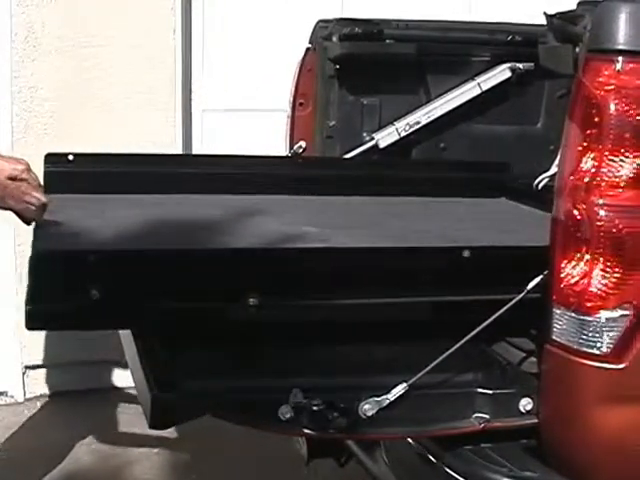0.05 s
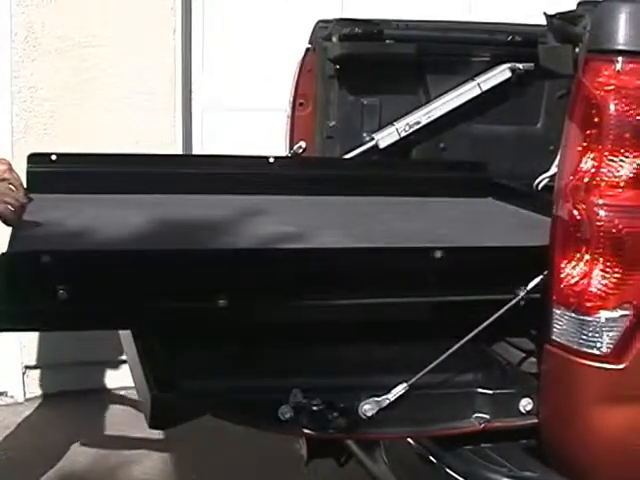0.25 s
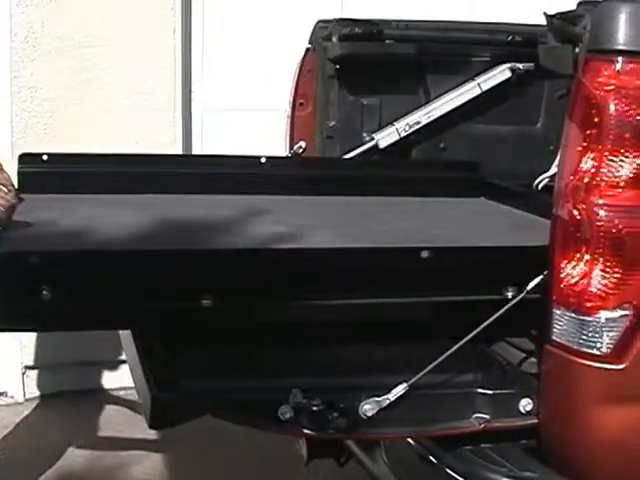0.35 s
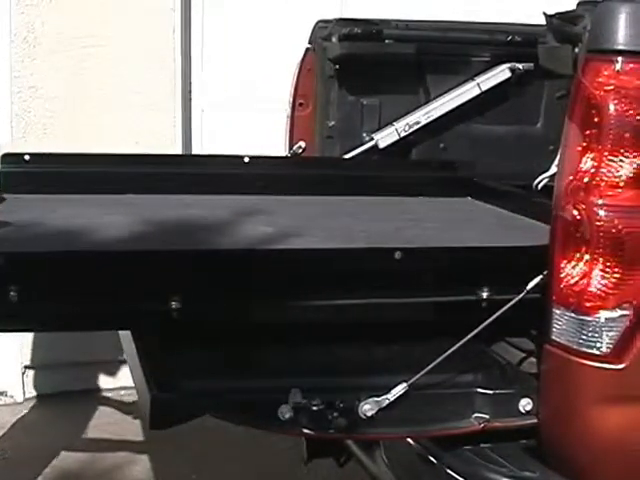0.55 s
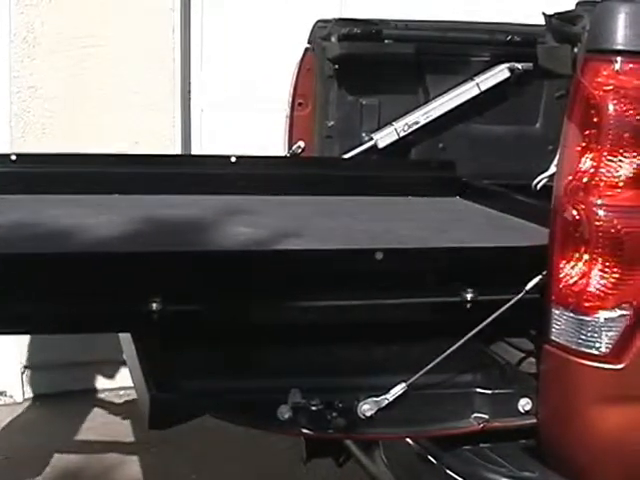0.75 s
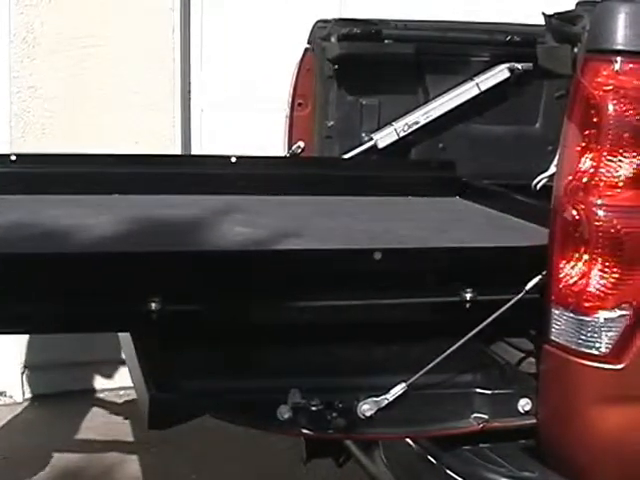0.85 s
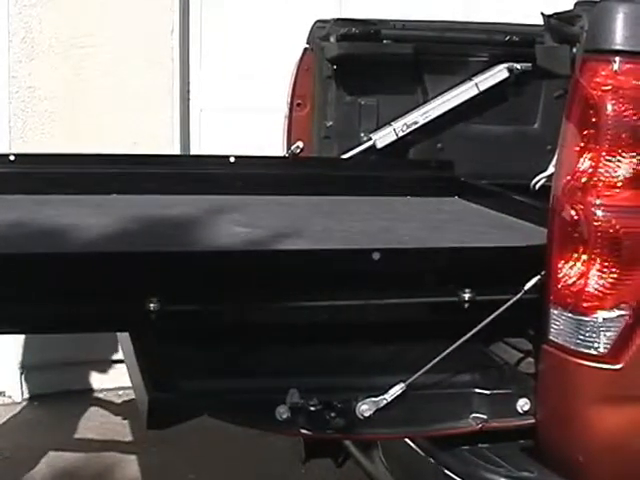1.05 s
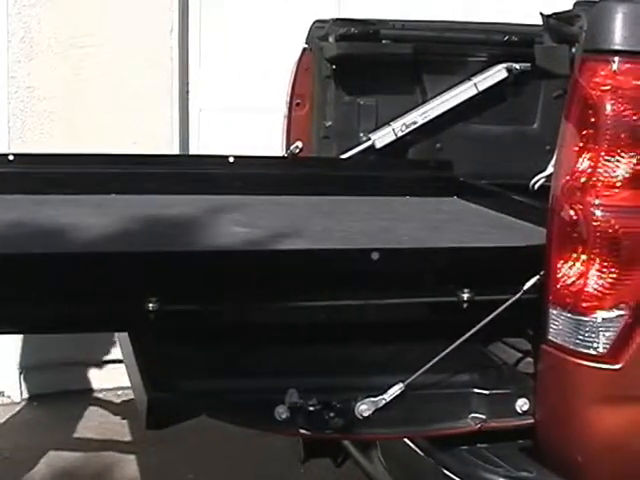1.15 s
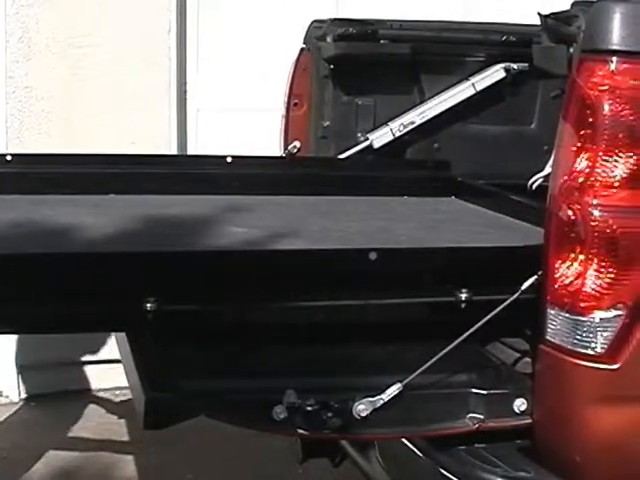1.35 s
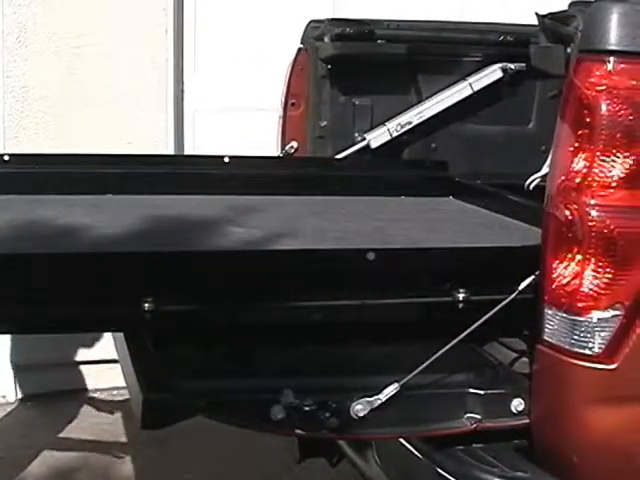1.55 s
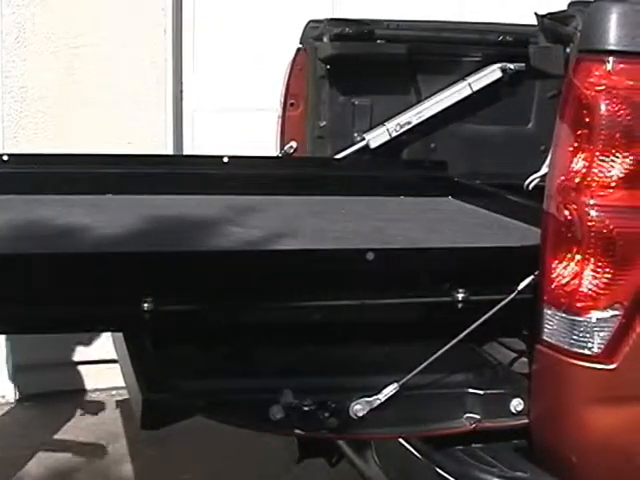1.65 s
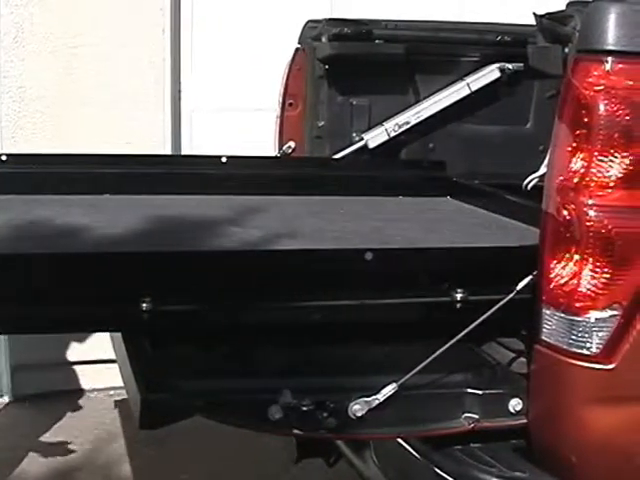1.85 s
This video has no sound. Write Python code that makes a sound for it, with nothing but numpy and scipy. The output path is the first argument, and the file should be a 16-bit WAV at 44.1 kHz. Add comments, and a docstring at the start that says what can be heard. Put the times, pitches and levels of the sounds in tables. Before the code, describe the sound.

A metal cargo tray slides along its rails with a very high, stuttering squeal, then hits its stop with a rattling thud and settles. Outdoors, faint wind puffs on the microphone over a quiet hiss.

```python
"""Cargo tray sliding to its stop

A metal tray rolls along its rails in a truck bed, outdoors. Friction makes a dry runner squeal near
10 kHz, with a weaker second mode and their combination tones. The tray hits its stop, rattles and
settles. Light puffs of wind bump the microphone; the squeal makes the camera turn its gain down."""
import sys
import numpy as np
from scipy import signal
from scipy.fft import rfft, irfft, next_fast_len
from scipy.io import wavfile
from scipy.ndimage import uniform_filter1d, minimum_filter1d, map_coordinates

SR = 44100
rng = np.random.default_rng(int(sys.argv[2]) if len(sys.argv) > 2 else 0)


def digitize_waveform(pressure):
    """Quantize a signal to 16-bit integers and store it at the path in sys.argv[1].

    Rows of a 2-D input are taken as channels; values are limited to [-1, 1].
    """
    field = np.atleast_2d(pressure).T
    bounded = np.clip(field, -1, 1)
    quanta = np.round(bounded * 32767).astype(np.int16)
    wavfile.write(sys.argv[1], SR, quanta)


N = 83790


def amp(db):
    """Decibels to gain."""
    return 10 ** (np.asarray(db) / 20)


def unit(x):
    """Scale to rms 1."""
    return x / np.sqrt(np.mean(x ** 2) + 1e-20)


def clock():
    """Sample times in s."""
    return np.arange(N) / SR


def along(points, hz):
    """Interpolate (f/Hz, value) points on a log axis."""
    f, v = np.transpose(points)
    return np.interp(np.log(hz + 1), np.log(f + 1), v)


def curve(rows):
    """Interpolate (t/s, value) rows per sample."""
    return np.interp(clock(), *np.transpose(rows))


def envelope(rows):
    """Gain from (t/s, level/dB) rows, falling 170 dB/s after the last."""
    return amp(curve(rows) - 170 * np.maximum(clock() - rows[-1][0], 0))


def wobble(rate_hz):
    """Smooth random curve through unit-variance knots."""
    knots = rng.standard_normal(int(N * rate_hz / SR) + 4)
    return map_coordinates(knots, [np.arange(N) * rate_hz / SR])


def swell(at_s, half_s):
    """Gaussian envelope, 1/e at half_s from its peak."""
    return np.exp(-((clock() - at_s) / half_s) ** 2)


def burst(at_s, rise_s, t60_s):
    """Linear rise, exponential decay."""
    age_s = clock() - at_s
    return np.clip(age_s / rise_s, 0, 1) * amp(-60 * np.maximum(age_s - rise_s, 0) / t60_s)


def filtered(x, response):
    """Zero-phase filter with gain response(hz)."""
    size = next_fast_len(N + SR // 2)
    return irfft(rfft(x, size) * response(np.fft.rfftfreq(size, 1 / SR)), size)[..., :N]


def noise(spectrum):
    """Coloured noise, rms 1."""
    return unit(filtered(rng.standard_normal(N), lambda hz: amp(along(spectrum, hz))))


def modal_noise(spectrum, spacing_hz, ripple_db):
    """Noise rung through many narrow modes of random strength, rms 1."""
    modes_db = ripple_db * rng.standard_normal(N)
    return unit(filtered(noise(spectrum), lambda hz: amp(map_coordinates(modes_db, [hz / spacing_hz]))))


def tone(hz):
    """Sine following a pitch, rms 1."""
    return np.sqrt(2) * np.sin(2 * np.pi * (np.cumsum(hz) / SR + rng.random()))


def ragged_tone(hz, stutter_db=3.6, rasp=.14):
    """Tone that stutters and rasps as a contact slips."""
    return tone(hz) * amp(stutter_db * wobble(129.86)) * (1 + rasp * wobble(900))


# Outdoor air: f/Hz, level/dB
AIR_SPECTRUM = [(220, -3), (700, -9.5), (1800, -16.5), (11500, -21), (13000, -63)]


def air(level_db=-60.5):
    """Quiet, slightly uneven hiss."""
    return amp(level_db + wobble(10.1)) * noise(AIR_SPECTRUM)


def hum(hz=358, level_db=-72):
    """Faint wavering tone."""
    return amp(level_db) * tone(hz + 4 * wobble(9.7))


# Wind rumble: f/Hz, level/dB
WIND_SPECTRUM = [(20, -16.5), (60, 1.5), (110, -2.5), (600, -69.5)]
# Puffs on the microphone: t/s, f/Hz, level/dB
WIND_BUMPS = [(.222, 75, -43), (.907, 80, -47), (1.169, 105, -45), (1.433, 120, -44.5), (1.636, 75, -50),
              (1.75, 130, -49), (1.802, 118, -37.5)]


def wind(rumble_db=-60.5, swing_db=3.3, half_cycles=.56):
    """Wind rumbles on the microphone; each puff is one short low pulse."""
    out = amp(rumble_db + swing_db * wobble(13)) * noise(WIND_SPECTRUM)
    for at_s, hz, db in WIND_BUMPS:
        wave = np.sqrt(2) * np.cos(2 * np.pi * hz * (clock() - at_s))
        out += amp(db) * swell(at_s, half_cycles / hz) * wave
    return out


# Settling rubs: t/s, rise/s, t60/s, level/dB
SCUFF_EVENTS = [(.94, 0.02, 0.19, -58.5), (1.707, 0.018, 0.18, -52), (1.751, 0.017, 0.15, -57.5)]
# Rub noise: f/Hz, level/dB
SCUFF_SPECTRUM = [(200, -8.5), (1800, 2), (4000, -2), (10500, -6), (14000, -32.5)]


def scuffs(grain_db=2.06):
    """Short grainy rubs as the tray settles."""
    return sum(amp(db + grain_db * wobble(350)) * burst(at_s, rise_s, t60_s) * noise(SCUFF_SPECTRUM)
               for at_s, rise_s, t60_s, db in SCUFF_EVENTS)


# Roller envelope: t/s, level/dB
ROLLER_LEVEL = [(0, -54.5), (.39, -49.5), (.56, -60)]
# Roller noise: f/Hz, level/dB
ROLLER_SPECTRUM = [(100, -5.5), (230, -1), (600, -5), (1100, -10), (2000, -25), (7000, -28), (13000, -71.5)]


def rollers(swing_db=1.505):
    """The rollers rumble unevenly in the tray."""
    return envelope(ROLLER_LEVEL) * amp(swing_db * wobble(65)) * noise(ROLLER_SPECTRUM)


# Side tones and faint squeaks: t/s, half-width/s, f/Hz, level/dB
SIDE_CHIRPS = [(.318, .03, 4835, -45.5), (.315, .03, 5270, -45.5), (.31, .013, 14906, -48.5),
               (.272, .015, 9660, -42), (.37, .019, 13830, -45.5), (.365, .03, 3840, -59),
               (.39, .04, 5220, -55), (.463, .024, 5180, -43), (.472, .0307, 14890, -43),
               (.486, .02, 7360, -40.5), (.49, .02, 6400, -40.5), (.49, .026, 3700, -51),
               (.54, .035, 3190, -55), (.54, .04, 9820, -38), (1.104, .027, 1153, -67),
               (1.24, .027, 1275, -70)]


def chirps(jitter=.006):
    """Brief rough side tones and faint squeaks around and after the main squeal."""
    return sum(amp(db) * swell(at_s, half_s) * ragged_tone(hz * (1 + jitter * wobble(400)))
               for at_s, half_s, hz, db in SIDE_CHIRPS)


# Runner grinding: f/Hz, level/dB
GRIND_SPECTRUM = [(2000, -56.5), (3300, -7), (4400, -14.5), (6800, -4.5), (8200, -15.5), (9500, 6),
                  (12000, -19.5), (13500, 2), (15000, -22.5)]


def grind(level_db=-31.5):
    """The runner grinds just before the stop, exciting dense rail modes."""
    gain = amp(level_db + 1.5 * wobble(200)) * burst(at_s=.458, rise_s=.017, t60_s=.19)
    return gain * modal_noise(GRIND_SPECTRUM, spacing_hz=170.3, ripple_db=7)


# Bed booms: t/s, half-width/s, f/Hz, level/dB
BED_THUMPS = [(.576, .008, 215, -35), (.601, .013, 222, -27.5), (.625, .012, 430, -30.5),
              (.695, .055, 105, -43)]


def thumps():
    """The tray's weight presses into its buffer and the bed booms."""
    return sum(amp(db) * swell(at_s, half_s) * tone(hz + 15 * wobble(100))
               for at_s, half_s, hz, db in BED_THUMPS)


# Panel modes, overall shape: f/Hz, level/dB
PANEL_SPECTRUM = [(40, -12.5), (205, -0.5), (450, 2), (1200, -4.5), (1700, -10.5), (2800, -14.5),
                  (9000, -23.5), (12500, -29.5), (15000, -68)]
# Panel decay: f/Hz, t60/s
PANEL_T60 = [(80, 1), (250, 0.46), (1000, 0.4), (9000, 0.36)]


def panel_wash(at_s, rise_s, treble_db):
    """A blow excites dense panel modes; the treble dies first."""
    panels = modal_noise(PANEL_SPECTRUM, spacing_hz=34.88, ripple_db=4)
    hz, frame_s, bins = signal.stft(panels, SR, nperseg=512)
    decay_db = -60 * np.maximum(frame_s - at_s - rise_s, 0) / along(PANEL_T60, hz)[:, None]
    shelf_db = treble_db * along([(300, 0), (2000, 1)], hz)[:, None]
    _, wash = signal.istft(bins * amp(decay_db + shelf_db), SR, nperseg=512)
    return wash[:N] * np.clip((clock() - at_s) / rise_s, 0, 1)


# Main tray modes: f/Hz, relative level/dB, t60/s
TRAY_MODES = [(110, -9, .75), (228, -4, .55), (268.45, -4, .45), (409, -10, .5), (463.35, -2, .38),
              (554, -3, .45), (703, -1, .33), (914, -6, .25), (1285, -6, .3)]


def tray_ring(at_s, rise_s):
    """A blow rings the tray's main modes, each wavering slightly."""
    return sum(amp(db) * burst(at_s, rise_s, t60_s) * tone(hz + 4 * wobble(50.37))
               for hz, db, t60_s in TRAY_MODES)


# Blows on the stop, then settling: t/s, rise/s, level/dB, treble gain/dB
STOP_BLOWS = [(.564, 0.011, -30.5, 0.5), (0.592, 0.008, -33, -1.5), (.615, 0.0072, -22.5, 1),
              (.651, .0043, -26.5, -5), (0.704, 0.0044, -33.5, -6.5), (.933, 0.013, -55, -3.5),
              (1.295, 0.017, -59.5, 0.5)]


def impacts(wash_db=-2.5, ring_db=-12.02, rattle_depth_db=2):
    """The tray hits its stop and settles; each blow rings it and rattles its panels."""
    out = np.zeros(N)
    for at_s, rise_s, db, treble_db in STOP_BLOWS:
        wash = amp(wash_db) * panel_wash(at_s, rise_s, treble_db)
        ring = amp(ring_db) * tray_ring(at_s, rise_s)
        rattle = amp(rattle_depth_db * wobble(260))
        out += amp(db) * (wash * rattle + ring)
    return out


# Steel stop modes: f/Hz, level/dB, t60/s
STOP_MODES = [(4720, -44, .06), (5330, -50, .55)]


def clink(jitter_hz=7):
    """The hardest blow rings the steel stop."""
    at_s, rise_s, *_ = max(STOP_BLOWS, key=lambda blow: blow[2])
    return sum(amp(db) * burst(at_s, rise_s, t60_s) * ragged_tone(hz + jitter_hz * wobble(96.3))
               for hz, db, t60_s in STOP_MODES)


# Second-mode surges: t/s, half-width/s, mode level/dB, upper tone/dB, lower tone/dB
MODE_SURGES = [(0.282, 0.033, -43, -36.5, -54.5), (0.4, .024, -35.5, -30, -45.5),
               (0.477, 0.032, -37, -32, -45.5)]


def surges(main_hz, second_hz):
    """The second mode surges and mixes with the main one, adding a tone above and one below."""
    pitches_hz = second_hz, 2 * main_hz - second_hz, main_hz - second_hz
    out = np.zeros(N)
    for at_s, half_s, *levels_db in MODE_SURGES:
        tones = sum(amp(db) * ragged_tone(hz) for db, hz in zip(levels_db, pitches_hz))
        out += swell(at_s, half_s) * tones
    return out


# Main runner mode: t/s, level/dB
MAIN_LEVEL = [(.125, -79.5), (.204, -24.5), (.222, -9.5), (.24, -10), (.272, -26.5), (.296, -11),
              (.322, -10), (.35, -16.5), (.385, -12), (.417, -21.5), (.458, -13), (.478, -22.5),
              (.492, -15), (.527, -12.5), (.546, -18), (.58, -15.5), (.63, -39), (.668, -34.5), (.716, -48),
              (.87, -67)]
# Friction noise around it: f/Hz, level/dB
SKIRT_SPECTRUM = [(8300, -70), (9400, -13), (10058, 0), (10700, -14), (11800, -70)]
# Runner catches: t/s
CATCH_TIMES = [.274, .414]
# Second mode between surges: t/s, level/dB
SECOND_LEVEL = [(0, -54), (.06, -75), (.13, -55.5), (.25, -46.5), (.34, -78), (.46, -58), (.51, -33.5),
                (.6, -47.5)]
# Second mode pitch: t/s, f/Hz
SECOND_HZ = [(.22, 6860), (.43, 6805), (.48, 6872)]


def squeal(pitch_hz=10058, jitter_hz=7, beat_hz=125, skirt_db=-27):
    """Friction drives two runner modes; the main one flutters and beats briefly at each catch."""
    main_hz = pitch_hz + jitter_hz * wobble(170)
    second_hz = curve(SECOND_HZ) + jitter_hz * wobble(120)
    grip = envelope(MAIN_LEVEL)
    flutter_db = 3.5 * clock() * (1 - grip / grip.max())  # deeper with time and weak grip
    flutter = amp(flutter_db * wobble(150))
    beat = 1 - sum(swell(at_s, half_s=.012) * np.sin(np.pi * beat_hz * (clock() - at_s)) ** 2
                   for at_s in CATCH_TIMES)
    main = grip * tone(main_hz) * flutter * beat
    skirt = grip * amp(skirt_db) * noise(SKIRT_SPECTRUM)
    second = envelope(SECOND_LEVEL) * tone(second_hz) * amp(wobble(90))
    return main + skirt + second + surges(main_hz, second_hz)


def scene():
    """Slide, stop and outdoor background, alike in both channels."""
    slide = squeal() + chirps() + grind() + rollers()
    stop = thumps() + impacts() + clink() + scuffs()
    outdoors = air() + wind() + hum()
    mono = slide + stop + outdoors
    return np.array([mono, mono])


def record(dry):
    """The camera's limiter ducks at once, holds and recovers; a low-pass ends the band."""
    limit_db, hold_s, release_db_per_s, top_hz = -18, .25, 48, 15200
    power = np.abs(uniform_filter1d(dry[0] ** 2, size=128))
    needed_db = np.minimum(limit_db - 10 * np.log10(power + 1e-12), 0)
    half_hold = int(hold_s * SR) // 2
    held_db = minimum_filter1d(needed_db, 2 * half_hold + 1, origin=half_hold, mode="nearest")
    recovery_db = release_db_per_s * clock()
    gain_db = np.minimum.accumulate(held_db - recovery_db) + recovery_db
    limited = dry * amp(uniform_filter1d(gain_db, size=128))
    return filtered(limited, lambda hz: hz < top_hz)


dry = scene()
out = record(dry)
digitize_waveform(out)
```